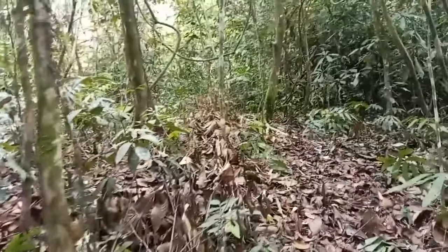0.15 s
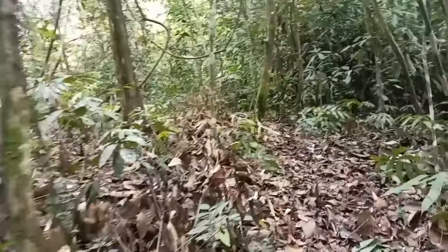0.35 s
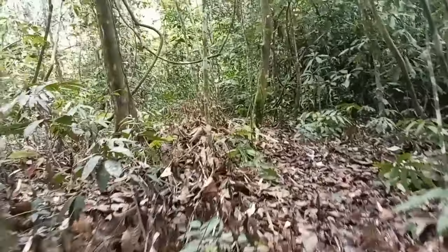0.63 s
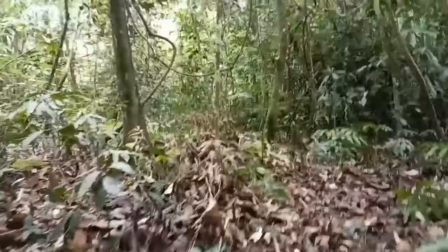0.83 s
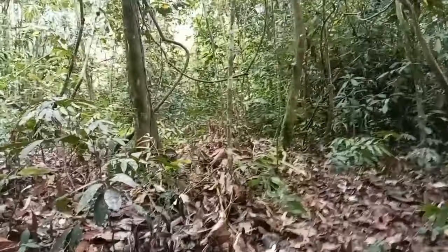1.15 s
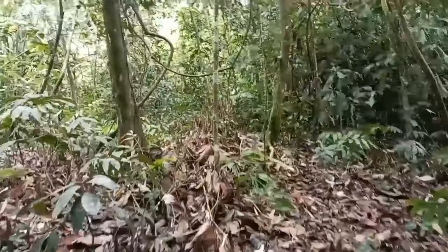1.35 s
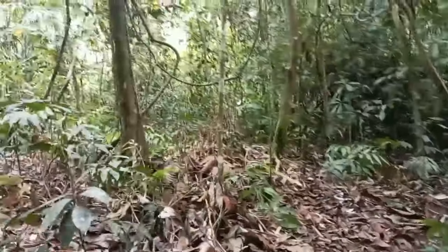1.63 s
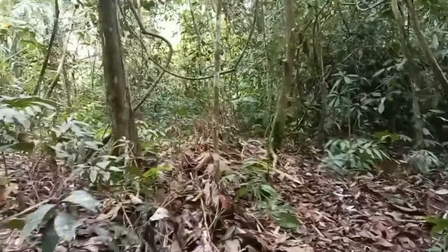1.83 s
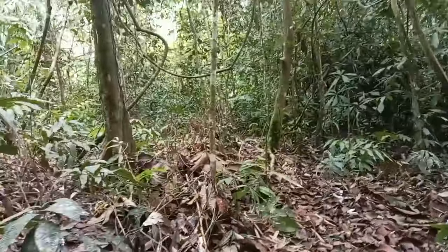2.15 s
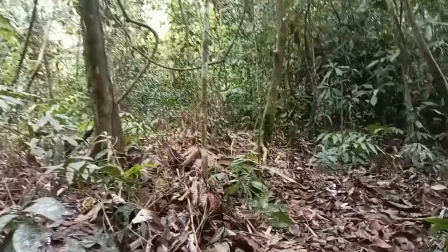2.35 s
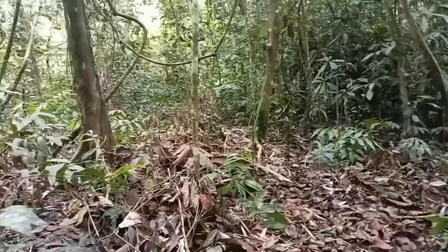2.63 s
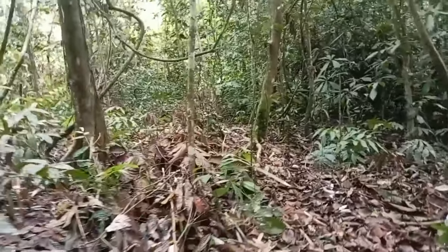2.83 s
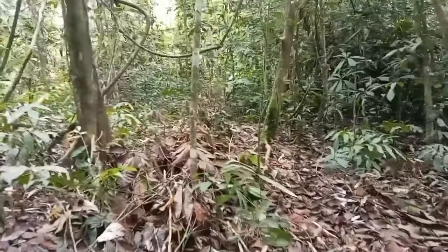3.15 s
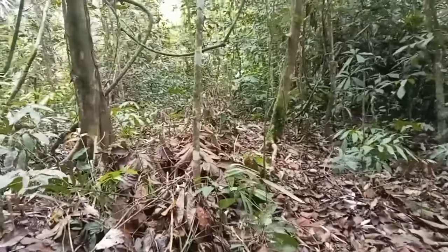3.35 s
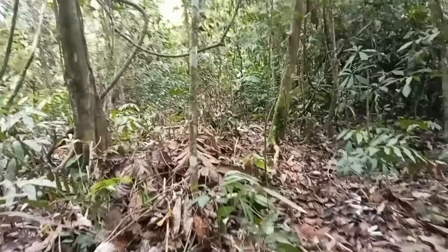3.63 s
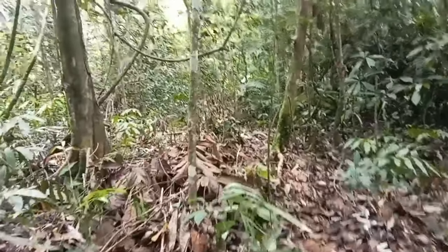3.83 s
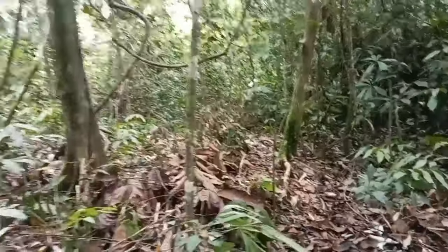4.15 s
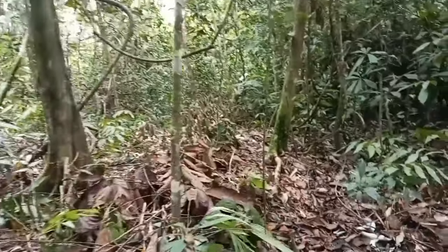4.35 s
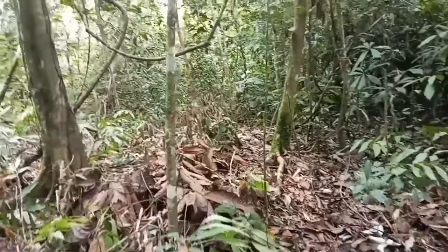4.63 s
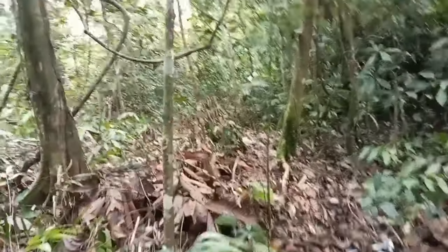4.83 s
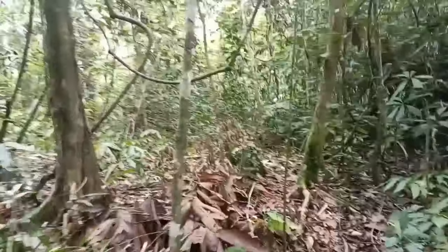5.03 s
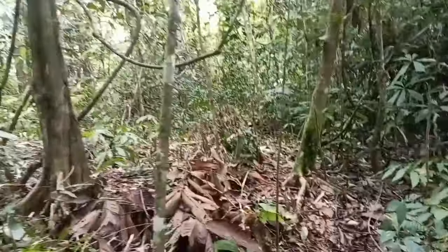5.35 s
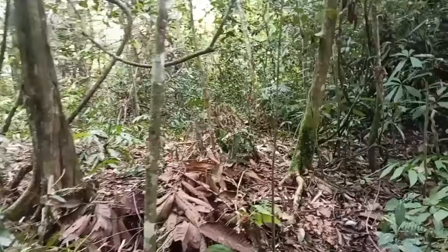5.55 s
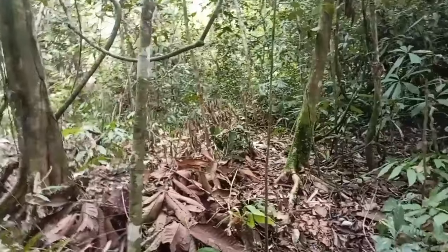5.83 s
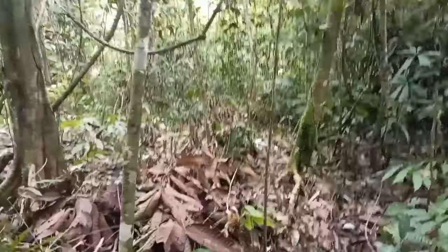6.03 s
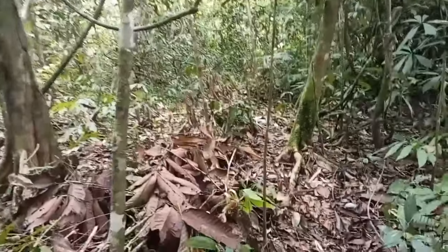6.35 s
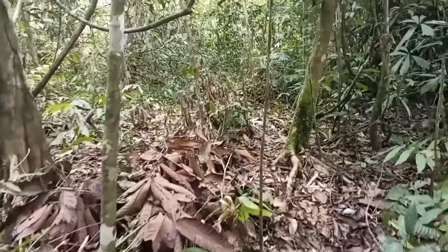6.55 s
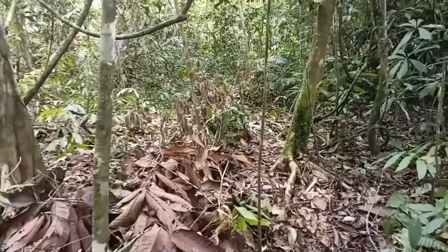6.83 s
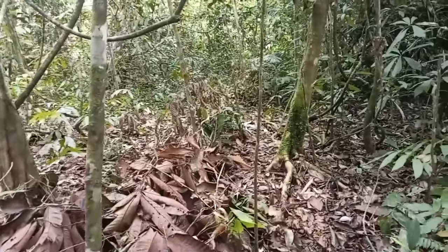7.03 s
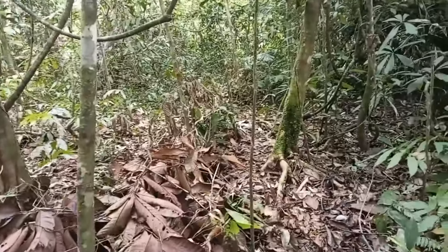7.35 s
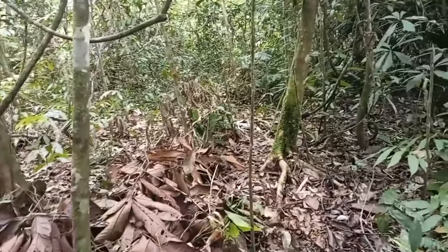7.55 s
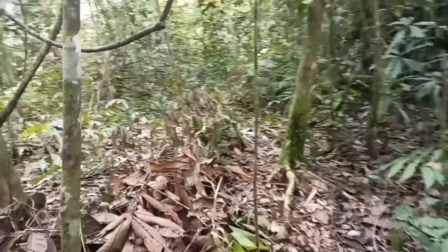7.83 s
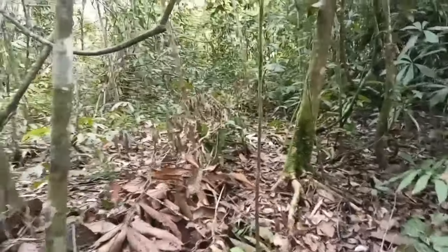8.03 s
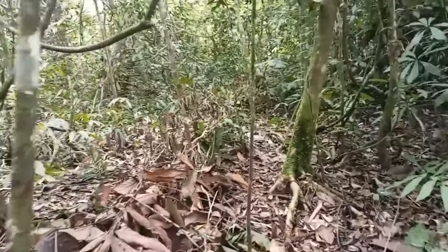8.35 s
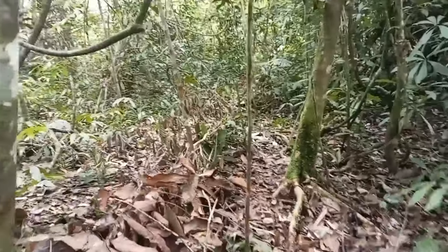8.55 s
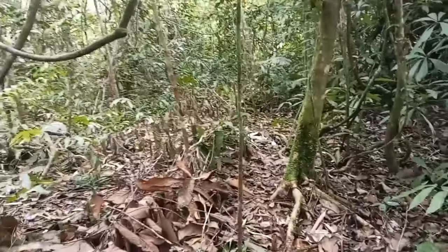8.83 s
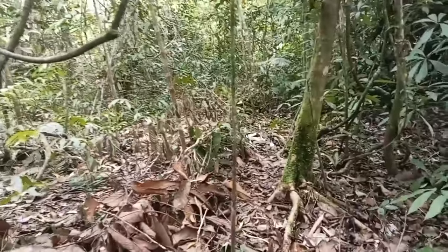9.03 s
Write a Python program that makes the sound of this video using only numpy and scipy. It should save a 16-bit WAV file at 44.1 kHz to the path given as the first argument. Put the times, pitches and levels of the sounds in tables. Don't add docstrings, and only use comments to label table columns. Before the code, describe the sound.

A mono outdoor scene in a tropical forest, the microphone carried by a walker. Throughout, cicadas make a steady thin hiss around 6 kHz, a far small engine throbs low at about 24 puffs a second, growing slightly, and the forest adds a faint wash. From 0.2 to 2.1 s dry leaves crunch loudly close by, with bright twig cracks and low root knocks, strongest around 0.7 and 1.3-1.5 s. Then the leaves mostly settle, with small crackles near 2.4, 2.8 and 4 s, softer steps at 4.8-5.1 and 5.7-6 s, and isolated snaps near 6.7, 7.9, 8.5 and 9.1 s. A bird gives short fluttering warbles near 0.9, 2.3, 3.5, 4.6, 5.7 and 6.9 s, then two broken calls at 7.7 and 8.5 s. High held whistles cluster at 2-3.4 s; gliding whistles come at 3.5, 4.2, 4.6 and 6.6-8.2 s, with blurred woodland echoes.

```python
import sys
import numpy as np
from scipy import signal
from scipy.fft import next_fast_len
from scipy.io import wavfile
from scipy.ndimage import uniform_filter1d

SR = 44100
rng = np.random.default_rng(int(sys.argv[2]) if len(sys.argv) > 2 else 0)


def gain_from_decibels(decibels):
    exponent = np.asarray(decibels, float) / 20
    return 10 ** exponent


def inscribe(sig):
    pcm = np.round(np.clip(np.atleast_2d(sig).T, -1, 1) * 32767)
    wavfile.write(sys.argv[1], SR, pcm.astype(np.int16))


N = 405499
TIME = np.arange(N) / SR


def evened(x):
    return x / np.sqrt(np.mean(x ** 2) + 1e-20)


def read(points, hz):
    f, value = np.transpose(points)
    return np.interp(np.log(hz + 1), np.log(f + 1), value)


def add(mix, s, sound):
    part = mix[round(s * SR):][:len(sound)]
    part += sound[:len(part)]


def coloured(x, points, size=4096):
    half = read(points, np.fft.rfftfreq(size, 1 / SR)) * np.log(10) / 20
    full = np.r_[half, half[-2:0:-1]]
    taps = np.fft.ifft(np.exp(full - 1j * signal.hilbert(full).imag)).real
    return signal.oaconvolve(x, taps)[:len(x)]


def resonate(x, hz, width):
    turn = np.exp(2j * np.pi * hz * np.arange(len(x)) / SR)
    r = np.exp(-np.pi * width / SR)
    return 2 * (turn * signal.lfilter([(1 - r) ** 2], [1, -2 * r, r * r], x / turn)).real


def drift(hz, size=N):
    span = int(SR / hz)
    smooth = uniform_filter1d(rng.standard_normal(size), span)
    return evened(uniform_filter1d(smooth, span))


# f/Hz, time to fall 60 dB/s
TRUNKS = [(500, 0.16), (2000, 0.75), (3500, 0.73), (5000, 0.85), (12000, 0.47)]


def trunks(x, shorter=1):
    taps, at = np.zeros(SR), np.arange(300, SR - 20, 20)
    taps[at + rng.integers(0, 20, len(at))] = rng.choice([-1., 1.], len(at))
    hz, t, z = signal.stft(taps, SR, nperseg=256)
    decay = gain_from_decibels(-60 * t / shorter / read(TRUNKS, hz)[:, None])
    tail = signal.istft(z * decay, SR, nperseg=256)[1]
    return signal.fftconvolve(x, tail / np.linalg.norm(tail))[:N]


# t/s, held/s, crunch level/dB, crisp edges below the crunch/dB
STEPS = [(.26, 0.11, -53, 6), (.37, 0.021, -49, 7), (.44, 0.033, -52, 1.5), (.535, 0.034, -48.5, 5.5),
         (.71, 0.033, -44.5, 12), (0.753, 0.0075, -48.5, 5), (.92, 0.074, -58, 4), (1.28, 0.13, -46.5, 6),
         (1.317, 0.028, -37.5, 1), (1.41, 0.09, -40.5, 1.5), (1.45, 0.12, -43, 2.5),
         (1.66, 0.078, -52, 6.5), (1.78, 0.096, -60, 2), (1.948, 0.096, -58.5, 8.5),
         (2.37, 0.041, -58.5, 6), (2.849, 0.19, -56.5, 8), (3.82, 0.085, -61, 10), (3.98, 0.029, -66, -2),
         (4.8, 0.087, -58, 8), (4.92, 0.034, -51, 6.5), (5.02, 0.091, -57.5, 6.5), (5.76, .07, -52.5, 10),
         (5.83, 0.074, -50, 9), (5.95, 0.064, -56.5, 7), (6.14, 0.059, -63, 19), (6.71, 0.024, -65, 9),
         (7.67, 0.0088, -78, -4), (7.855, 0.052, -54.5, 12), (8.5, 0.21, -65, 5), (9.15, 0.021, -67, -2)]
PRESS_DB_PER_S, SETTLE_DB_PER_S = 504, 174
BED_DB, BED_CRISP_DB = -70, -76.5


def weight():
    t = TIME[::64]
    start, hold, db, below_db = np.transpose(STEPS)[:, :, None]
    press_db = PRESS_DB_PER_S * np.maximum(start - t, 0)
    settle_db = SETTLE_DB_PER_S * np.maximum(t - start - hold, 0)
    step_db = db - press_db - settle_db
    crunch_db = np.maximum(step_db.max(0), BED_DB)
    crisp_db = np.maximum((step_db - below_db).max(0), BED_CRISP_DB)
    return np.interp(TIME, t, crunch_db), np.interp(TIME, t, crisp_db)


# f/Hz, level per Hz/dB
LEAVES = [(120, -69), (200, -5), (305, -3.5), (1040, -9.5), (1840, 1), (2800, -2.5), (3830, 3), (5230, -6),
          (6170, -6.5), (7830, -23.5), (9930, -11.5), (14100, -23), (16000, -27)]


def leaves():
    crunch_db, crisp_db = weight()
    clumps = np.clip((crunch_db + 68) / 12, .45, 1)
    dense = 9000 / SR * gain_from_decibels(clumps * (3 * drift(150) + 2 * drift(50)))
    size = gain_from_decibels(clumps * 2.3 * np.minimum(rng.exponential(1, N), 4))
    size = size / np.sqrt(uniform_filter1d(size ** 2 * dense, 6000))
    clicks = size * rng.standard_normal(N) * (rng.random(N) < dense)
    leaf, tones = rng.integers(0, 6, N), np.geomspace(500, 5000, 6)
    rings = sum(resonate(clicks * (leaf == k), hz, 1.26 * hz) / np.sqrt(hz) for k, hz in enumerate(tones))
    crunch = coloured(evened(rings) + 0.93 * evened(clicks), LEAVES[:9] + [(7500, -77.0)])
    treble = signal.butter(4, 6500, "high", fs=SR, output="sos")
    crisp = signal.sosfilt(treble, coloured(clicks, LEAVES))
    bursts_db = clumps * 1.0 * drift(40)
    near = gain_from_decibels(crunch_db + bursts_db + 5.0) * evened(crunch)
    near += gain_from_decibels(crisp_db + bursts_db + 3.5) * evened(crisp)
    return near + gain_from_decibels(-12.0) * trunks(near)


SNAP_TIME = np.arange(1200) / SR


def snap(out, cracks, s, db, hz, treble_db, crack_db):
    t = SNAP_TIME
    crack, fizz = rng.standard_normal((2, len(t)))
    ring = np.sin(2 * np.pi * hz * t) * gain_from_decibels(-60 * t / (14 / hz))
    fizz = evened(resonate(fizz, 9950, 1700) + gain_from_decibels(-8) * resonate(fizz, 12000, 5000))
    fizz *= gain_from_decibels(-60 * t / 0.0061)
    add(out, s, gain_from_decibels(db - 5.5) * ring + gain_from_decibels(treble_db - 9.5) * fizz)
    add(cracks, s, gain_from_decibels(db + crack_db - 60 * t / 0.02) * crack * np.minimum(t / 0.00034, 1))


# t/s, peak level/dB, ring f/Hz, treble level/dB
TWIGS = [(0.25, -24, 3790, -41), (0.755, -12.5, 3600, -16.5), (1.319, -20, 2320, -39),
         (1.3347, -27, 1880, -36), (1.4072, -12.5, 4200, -18), (1.4196, -8, 1670, -38),
         (1.5054, -26, 3840, -15), (1.584, -15.5, 2050, -45), (1.5967, -15, 2320, -44),
         (2.051, -21.5, 1820, -41), (2.063, -20.5, 2280, -46), (3.991, -23, 4030, -19.5),
         (3.9895, -19.5, 1660, -50), (4.1236, -33, 4620, -29), (6.7193, -18, 4250, -26),
         (7.678, -34, 4870, -26.5), (7.9028, -19.5, 2010, -45), (8.536, -25.5, 2470, -30),
         (9.0567, -30.5, 3560, -37), (9.1596, -32.5, 1510, -46), (1.875, -46, 3600, -49),
         (7.295, -36, 3000, -58), (8.985, -38, 3500, -56)]


def twigs(out, cracks):
    for row in TWIGS:
        snap(out, cracks, *row, crack_db=0)


# t/s, peak level/dB, ring f/Hz
SNAPS = [(0.284, -20.5, 2980), (0.375, -21, 3720), (0.389, -23, 3840), (0.497, -18.5, 3630),
         (0.708, -12.5, 2100), (0.934, -26, 3980), (0.988, -21, 4050), (1.047, -24.5, 4000),
         (1.24, -30, 2070), (1.6751, -21.5, 2590), (1.7179, -22, 1625), (1.9732, -25.5, 950),
         (2.385, -26, 2060), (3.2438, -29, 4430), (3.442, -25, 1360), (4.3186, -28.5, 2500),
         (4.901, -21, 3650), (5.018, -20, 3320), (5.071, -22.5, 3900), (5.3024, -25.5, 2480),
         (5.3395, -29, 3720), (5.7259, -24.5, 1500), (6.9636, -31, 3500), (7.86, -21, 2100),
         (7.989, -29, 3600), (0.099, -29.5, 2970), (2.18, -37, 2800), (3.168, -32, 1550),
         (5.185, -32, 3900), (6.915, -33, 3220),
         (.2043, -32, 2100), (0.3165, -28, 3890), (0.4163, -31, 2050), (0.44, -25, 1900),
         (.4822, -30, 4270), (0.54, -30, 2900), (.576, -25.5, 1870), (.585, -26, 3700), (.6822, -30, 2890),
         (0.706, -25, 3580), (0.722, -16, 2250), (.733, -19, 3500), (0.761, -13, 2080), (.764, -21, 4200),
         (1.003, -30, 3900), (1.27, -32, 2050), (1.287, -22, 1840), (1.322, -18, 2900), (1.41, -17, 2200),
         (1.465, -15, 3900), (1.48, -22, 2600), (1.775, -25, 3750), (1.9162, -28, 3870),
         (2.0521, -17, 3580), (2.287, -36, 2600), (3.9898, -14, 4380), (3.9909, -19.5, 3600),
         (1.712, -18.5, 4100), (1.588, -17, 3700), (3.727, -36, 3500), (3.8, -36, 3300), (.826, -32, 4300),
         (4.331, -37, 2000), (4.94, -30, 3500), (5.004, -25, 4300), (5.042, -28, 4100), (5.781, -30, 4200),
         (5.844, -22, 3900), (5.888, -34, 3800), (5.916, -34, 4100), (5.953, -29, 4000), (6.036, -47, 1300),
         (7.925, -30, 3500),
         (0.706, -21, 2140), (1.2977, -21, 1790), (3.8594, -33, 3960), (3.8761, -34, 2000),
         (5.7594, -35, 2160), (5.8644, -26, 2300), (5.9115, -34, 2060), (5.9844, -41, 2100),
         (6.3974, -47, 1590), (6.7202, -26, 4200), (8.098, -37, 4650), (8.6173, -35, 2180),
         (8.7044, -38, 2190)]


def stiff_leaves(out, cracks):
    for row in SNAPS:
        snap(out, cracks, *row, treble_db=-54, crack_db=-3)


# t/s, level/dB
KNOCKS = [(.3737, -41), (0.3899, -32), (0.71, -28), (1.2397, -41), (1.319, -38), (1.3352, -36),
          (1.4184, -30), (1.6744, -39), (2.05, -36.5), (5.072, -34), (5.7246, -34.5), (7.679, -35.5)]


def knocks(out):
    for s, db in KNOCKS:
        thud = evened(resonate(rng.standard_normal(len(SNAP_TIME)), 680, 1100))
        add(out, s, gain_from_decibels(db - 4.5 - 60 * SNAP_TIME / 0.037) * thud)


def snaps():
    out, cracks = np.zeros((2, N))
    twigs(out, cracks)
    stiff_leaves(out, cracks)
    knocks(out)
    out += gain_from_decibels(-7.0) * coloured(cracks, LEAVES)
    return out + gain_from_decibels(-23.5) * trunks(out)


def note(rows, warble_hz=33.7, waver_db=0.0, unsteady=0.0):
    s, *columns = np.transpose(rows)
    t = np.arange(s[0], s[-1], 1 / SR)
    hz, db, *depth = (np.interp(t, s, c) for c in columns)
    hz = uniform_filter1d(hz, 600, mode="nearest") * (1 + unsteady * drift(76, size=24000)[:len(t)])
    hz = hz + sum(depth) * np.cos(2 * np.pi * warble_hz * (t - s[1]))
    tone = np.sqrt(2) * np.sin(2 * np.pi * np.cumsum(hz) / SR) * signal.windows.tukey(len(t), .15)
    return s[0], tone * gain_from_decibels(db + waver_db * drift(130, size=24000)[:len(t)])


def sing(rows, direct, direct_db, tail, echo_db, unsteady):
    s, call = note(rows, waver_db=3.0, unsteady=unsteady)
    add(direct, s, gain_from_decibels(direct_db) * call)
    add(tail, s, gain_from_decibels(echo_db) * call)


WARBLE_LOW_HZ, WARBLE_FOOT_HZ, WARBLE_END_HZ = 1608, 1842, 2060
SCOOP_S, SCOOP_DB, WARBLE_DEPTH_HZ, FOOT_HELD_S = 0.01886, -22, 128, 0.0157
NARROW_SHARE, NARROWED = 0.37, 0.54
TOP_DIP_DB_PER_KHZ = -12.5


def warble(start, length, db, top_hz, swell_db, foot_hz, climb, hold):
    foot_s, foot_db = start + SCOOP_S, db - swell_db / 2
    top_db = db + TOP_DIP_DB_PER_KHZ * (top_hz - WARBLE_END_HZ) / 1000
    top_depth_hz = NARROWED * WARBLE_DEPTH_HZ
    return [(start, WARBLE_LOW_HZ, db + SCOOP_DB, 0),
            (foot_s, foot_hz, foot_db, WARBLE_DEPTH_HZ),
            (foot_s + FOOT_HELD_S, foot_hz, foot_db, WARBLE_DEPTH_HZ),
            (start + NARROW_SHARE * length, WARBLE_END_HZ, db, WARBLE_DEPTH_HZ),
            (start + climb * length, top_hz, top_db, top_depth_hz),
            (start + min(climb + hold, .95) * length, top_hz, top_db, top_depth_hz),
            (start + length, WARBLE_END_HZ, db + swell_db / 2, 0)]


# t/s, length/s, level/dB, highest f/Hz, swell from start to end/dB
WARBLES = [
    (0.924, 0.15, -33.5, 2093, 7),
    (2.309, 0.16, -39.5, 2407, -12.5),
    (3.528, 0.19, -42.5, 2150, 4),
    (4.575, .14, -40.5, 2435, -2.5),
    (5.717, .16, -45, 2436, 2),
    (6.879, 0.13, -39, 2100, 8),
]
WARBLE_FEET_HZ = [1940, 2000, 1820, 1860, 1730, 1880]
WARBLE_CLIMBS = [0.69, .68, 0.596, .68, .52, 0.62]
WARBLE_HOLDS = [.05, .02, .15, 0.048, .24, 0.11]
WARBLE_ECHO_DB = [-9, -5.5, -1.5, -2.5, 0, -1]
# delay/s, level/dB
NEAR_TRUNKS = [(.0031, -9.5), (.0074, -4)]


def warbling_bird(direct, echoed):
    calls = zip(WARBLES, WARBLE_FEET_HZ, WARBLE_CLIMBS, WARBLE_HOLDS, WARBLE_ECHO_DB)
    for row, foot_hz, climb, hold, echo_db in calls:
        s, call = note(warble(*row, foot_hz, climb, hold), waver_db=2.5, unsteady=0.0066)
        add(direct, s, gain_from_decibels(1.0) * call)
        for delay, db in NEAR_TRUNKS:
            add(direct, s + delay, gain_from_decibels(db - 4.5) * call)
        add(echoed, s, gain_from_decibels(echo_db) * call)


LOW_NOTE_S, JUMP_S, STRAND_HZ, ARCH_HZ, DROP_S = 0.046, 0.0078, 2398, 40, .045


def split_call(start, length, low_db, high_db, drop_db):
    jump, drop = start + LOW_NOTE_S, start + length - DROP_S
    return [(start, WARBLE_LOW_HZ - 80, low_db + SCOOP_DB, 0),
            (start + SCOOP_S, WARBLE_FOOT_HZ, low_db + 0.5, 90),
            (jump, WARBLE_FOOT_HZ - 130, low_db, 0), (jump + JUMP_S, STRAND_HZ, high_db - 11, 30),
            ((jump + drop) / 2, STRAND_HZ + ARCH_HZ, high_db, 30), (drop, STRAND_HZ, high_db + 0.5, 30),
            (drop + DROP_S / 2, WARBLE_END_HZ + 80, drop_db, 0), (start + length, WARBLE_END_HZ, drop_db, 0)]


GLIDE_TOP_HZ, GLIDE_ONSET_DB, GLIDE_FADE_DB = 5685, -8, -10


def glide(start, length, db, knee_hz, last_hz, fall_s):
    t = np.linspace(0, length, num=24)
    fall = np.exp(-t / fall_s)
    hz = knee_hz + (last_hz - knee_hz) * t / length + (GLIDE_TOP_HZ - knee_hz) * fall
    level_db = db + GLIDE_ONSET_DB * fall + GLIDE_FADE_DB * (t / length) ** 2
    return np.transpose([start + t, hz, level_db])


def flick(start, length, db, first_hz, last_hz):
    top_s = start + length
    return [(start, first_hz, db), (top_s, last_hz, db), (top_s + 0.034, last_hz, db - 31)]


def held(start, length, db, first_hz, last_hz):
    return [(start + u * length, first_hz + u * (last_hz - first_hz), db + change_db)
            for u, change_db in ((0, -9), (0.31, 0), (1, -8.5))]


# t/s, length/s, level/dB, first f/Hz, last f/Hz
WHISTLES = [(.79, 0.082, -47, 2990, 2825), (.82, 0.11, -55.5, 958, 930), (1.02, .11, -57.5, 973, 920),
            (1.17, 0.11, -58, 935, 920), (1.75, 0.28, -59.5, 925, 936), (2.1, 0.3, -50.5, 3535, 3504),
            (2.33, 0.14, -45.5, 3440, 3350), (2.42, 0.24, -44.5, 3833, 3745),
            (2.6, 0.28, -37.5, 4155, 4120), (2.84, 0.085, -39, 4094, 4080), (2.9, 0.12, -55.5, 2450, 2575),
            (2.94, 0.19, -42.5, 4595, 4765), (3.1, 0.074, -43.5, 4540, 4310),
            (3.15, 0.17, -47.5, 4360, 4380), (3.12, 0.224, -46, 5217, 5280), (3.2, 0.3, -56.5, 3005, 2920),
            (3.38, .14, -55.5, 2480, 2527), (4.49, 0.046, -56.5, 3580, 3600), (5.05, 0.36, -55, 363, 364),
            (5.59, 0.25, -49.5, 2920, 2940), (6.912, 0.156, -49.5, 2473, 2570),
            (7.42, 0.14, -51.5, 2404, 2580), (8.5, 0.25, -56, 2960, 2950), (7.358, 0.031, -43, 3910, 2520)]
# t/s, length/s, level/dB, knee f/Hz, last f/Hz
GLIDES = [
    (3.52, 0.29, -45.5, 4900, 3984),
    (4.21, 0.28, -48.5, 4694, 4780),
    (4.56, 0.26, -44, 5150, 3590),
    (6.595, 0.24, -49, 3600, 4250),
    (7.075, .29, -43, 4890, 3900),
    (7.645, 0.21, -42.5, 4260, 4410),
    (8.015, 0.26, -45, 4990, 3750),
]
GLIDE_FALLS_S = [.031, .04, .031, .061, .031, .06, .031]
# t/s, length/s, low note, high strand, last drop level/dB
SPLIT_CALLS = [
    (7.72, .18, -39.5, -48, -44),
    (8.47, .17, -46, -47, -42),
]
# t/s, scoop length/s, level/dB, first f/Hz, last f/Hz
FLICKS = [
    (5.36, 0.036, -53, 2690, 3540),
    (8.07, 0.0226, -51, 2980, 3630),
]
# t/s, length/s, level/dB, first f/Hz, last f/Hz
FAR_NOTES = [(6.08, 0.076, -52, 4100, 3900), (6.14, .05, -52.5, 5200, 2000),
             (6.105, 0.058, -52, 4700, 4300), (6.42, 0.072, -62, 2600, 1700), (7.17, 0.14, -64, 2680, 2500),
             (8.672, 0.034, -50.5, 4800, 3800), (0.68, 0.098, -62, 2200, 4200),
             (5.47, .14, -63.5, 2920, 2940)]


def birds():
    direct, echoed, glides, far = np.zeros((4, N))
    warbling_bird(direct, echoed)
    for row in WHISTLES:
        sing(held(*row), direct, -4, echoed, -3.5, unsteady=.0025)
    for row, fall_s in zip(GLIDES, GLIDE_FALLS_S):
        sing(glide(*row, fall_s), direct, -2.5, glides, -5, unsteady=.003)
    for row in SPLIT_CALLS:
        sing(split_call(*row), direct, -1.5, echoed, -5.5, unsteady=.006)
    for row in FLICKS:
        sing(flick(*row), direct, -4, echoed, -2.5, unsteady=.003)
    for row in FAR_NOTES:
        sing(held(*row), direct, -14, far, 2.5, unsteady=.006)
    return direct + trunks(echoed), glides, far


def smear(x, spread_hz):
    shake = np.exp(2j * np.pi * np.cumsum(spread_hz * drift(400)) / SR)
    return (signal.hilbert(x, next_fast_len(N))[:N] * shake).real


# t/s, length/s, level/dB, first f/Hz, last f/Hz
STRAYS = [(5.88, .1, -57, 2900, 2850), (8.15, .07, -60, 3100, 2950), (3.54, .03, -58, 2300, 3300),
          (8.695, .025, -58, 3800, 2300), (8.22, 0.304, -59.5, 2980, 2930), (6.04, .06, -54, 5150, 5250),
          (6.64, 0.054, -59, 2500, 1900), (4.795, 0.0246, -54, 3600, 2900), (6.085, .08, -55, 4150, 3500),
          (4.42, .07, -62.5, 2350, 2250), (8.6, .04, -55, 2150, 2050)]


def foliage(glides, far):
    strays = np.zeros(N)
    for row in STRAYS:
        add(strays, *note(held(*row), waver_db=2.0, unsteady=0.0041))
    blurred = smear(glides + strays, spread_hz=35) + smear(far, spread_hz=190)
    return gain_from_decibels(-6.0) * strays + trunks(blurred, shorter=0.77)


# f/Hz, width/Hz, level/dB
CHOIRS = [
    (5716, 496, -52),
    (6150, 904, -55.5),
    (11260, 900, -64.5),
    (12300, 1300, -80),
]
# t/s, level/dB
CHORUS = [(0, -50), (1.2, -49.5), (3, -49), (5, -49.5), (7.1, -48.5), (9.19, -49.5)]


def choirs():
    out = np.zeros(N)
    swell_db = np.interp(TIME, *np.transpose(CHORUS)) + 50
    for hz, width, db in CHOIRS:
        clicks = rng.standard_normal(N) * (rng.random(N) < 6000 / SR)
        hiss = resonate(resonate(clicks, hz, 1.7 * width), hz, 1.7 * width)
        out += evened(hiss) * gain_from_decibels(db + swell_db + 1.0 * drift(28))
    return out


# t/s, end t/s, f/Hz, width/Hz, level/dB
NARROW_SONGS = [(0.113, 0.4, 7750, 700, -69), (0.452, 1.3, 7500, 700, -68), (2.1, 3.1, 14800, 1500, -65),
                (3.814, 4.423, 7750, 166, -69.5), (4.26, 5.14, 8760, 200, -80), (5.14, 5.6, 7740, 198, -68),
                (5.5, 5.62, 7240, 300, -62), (6.0, 6.85, 9100, 350, -83), (3.048, 3.596, 2986, 148.1, -56.5),
                (8.161, 8.886, 2920, 170, -56), (3.37, 3.53, 2480, 180, -55), (4.49, 4.596, 3470, 200, -62),
                (8.0, 8.85, 8770, 350, -77)]


def narrow_songs():
    out = np.zeros(N)
    for start, end, hz, width, db in NARROW_SONGS:
        clicks = rng.standard_normal(SR)[:round((end - start) * SR)]
        song = evened(resonate(clicks, hz, width)) * gain_from_decibels(2.0 * drift(16, size=SR)[:len(clicks)])
        add(out, start, gain_from_decibels(db) * song * signal.windows.tukey(len(clicks), .6))
    return out


# f/Hz, level/dB
EXHAUST = [(60, -28), (97, -2.5), (122, 5), (146, 2), (170, 0), (197, -7.5), (222, -6.5), (250, -9.5),
           (297, -8), (330, -11.5), (380, -18), (520, -35), (900, -40)]
# t/s, firings a second/Hz
ENGINE_SPEED = [(0.0, 23.5), (1.66, 23.4), (3.25, 23.8), (3.81, 24.2), (4.04, 24.5), (4.53, 24.7),
                (5.17, 24.3), (5.58, 24.7), (6.4, 24.6), (6.5, 24.5), (8.22, 24.2), (8.96, 24.5),
                (9.19, 24.2)]
# t/s, level/dB
ENGINE_LEVEL = [(0.0, -52), (1.56, -48.5), (1.69, -49), (8.37, -43.5), (9.01, -45.5), (9.14, -43),
                (9.19, -45)]


def engine():
    speed = np.interp(TIME, *np.transpose(ENGINE_SPEED))
    turns = 0.3036 + np.cumsum(speed) / SR
    knots = np.arange(40) / 4
    chance = rng.standard_normal((24, 2, len(knots)))
    orders = np.zeros(N)
    for k, (sway, wander) in enumerate(chance[3:], 3):
        lag = 0.85 * k + 0.0313 * k ** 2
        phase = 2 * np.pi * k * turns - lag + 0.091 * k * np.interp(TIME, knots, wander)
        orders += gain_from_decibels(1.5 * np.interp(TIME, knots, sway)) * np.cos(phase)
    turbulence = np.exp(-(turns % 1) / 0.55) * rng.standard_normal(N)
    puffs = evened(orders) + 1.4 * evened(turbulence)
    level_db = np.interp(TIME, *np.transpose(ENGINE_LEVEL))
    return gain_from_decibels(level_db - 3.0) * evened(coloured(puffs, EXHAUST))


# f/Hz, level per Hz/dB
AIR = [(25, -2.5), (60, 1.5), (120, 0.5), (200, 3), (400, -2), (700, -4), (1000, -13), (2160, -9.5),
       (3500, -24), (4740, -71), (7900, -56), (9800, -36), (12000, -15), (16000, -30.5)]
AIR_DB = -54.5


def air():
    frames, hz = N // 256 + 5, np.fft.rfftfreq(1024, 1 / SR)
    a, b, patches = rng.standard_normal((frames, 513, 3)).T
    patches = evened(uniform_filter1d(uniform_filter1d(patches, 12, 0), 14, 1))
    z = (a + 1j * b) * gain_from_decibels(read(AIR, hz)[:, None] + 2.13 * patches)
    return gain_from_decibels(AIR_DB) * evened(signal.istft(z, nperseg=1024, noverlap=768)[1][:N])


def scene():
    near_birds, glides, far = birds()
    mono = near_birds + choirs() + narrow_songs() + leaves() + snaps() + engine() + air()
    mono += foliage(glides, far)
    return np.array([mono, mono])


def band_limit(x):
    return signal.sosfilt(signal.butter(12, 16460, fs=SR, output="sos"), x)


def record(dry):
    bass_cut = signal.butter(4, 50, "high", fs=SR, output="sos")
    treble_cut = signal.firwin(1023, 15560, window=("kaiser", 9), fs=SR)
    mix = signal.oaconvolve(signal.sosfilt(bass_cut, dry), treble_cut[None], "same")
    return band_limit(mix)


dry = scene()
out = record(dry)
inscribe(out)
```